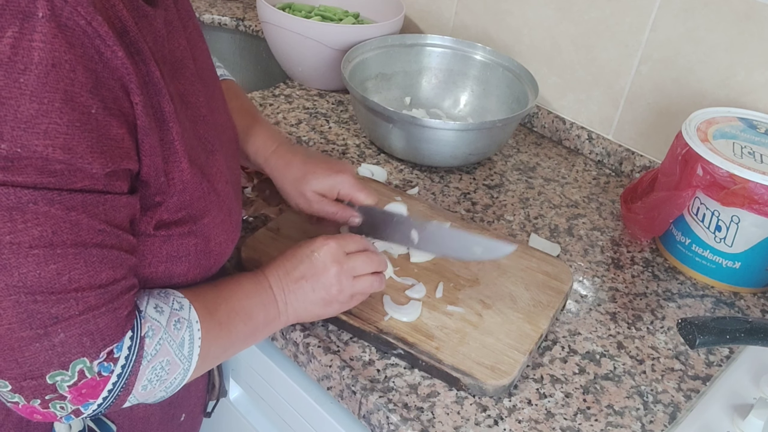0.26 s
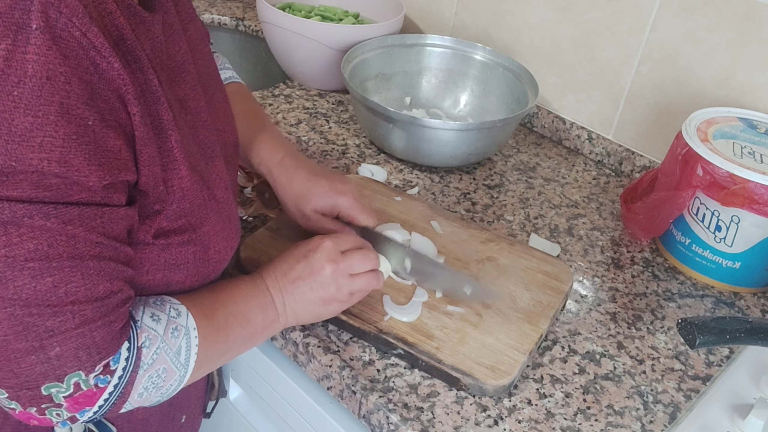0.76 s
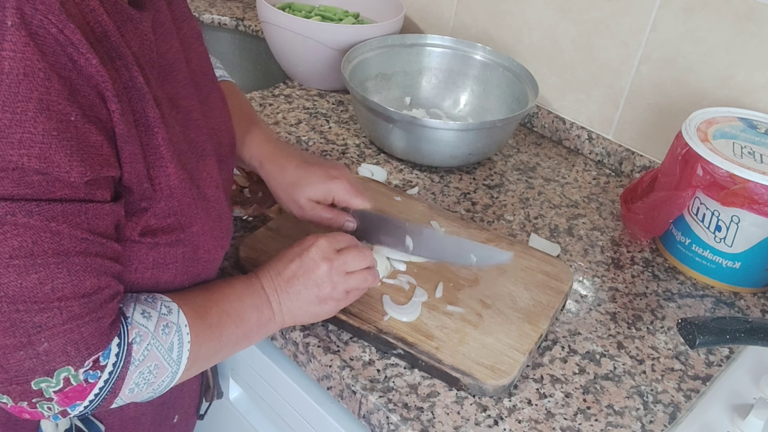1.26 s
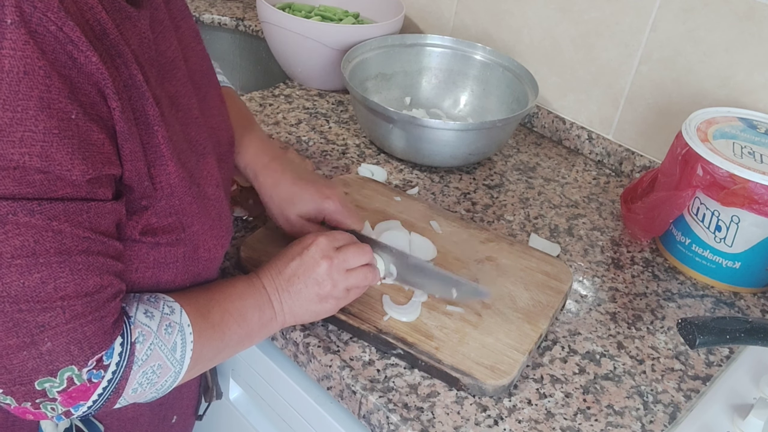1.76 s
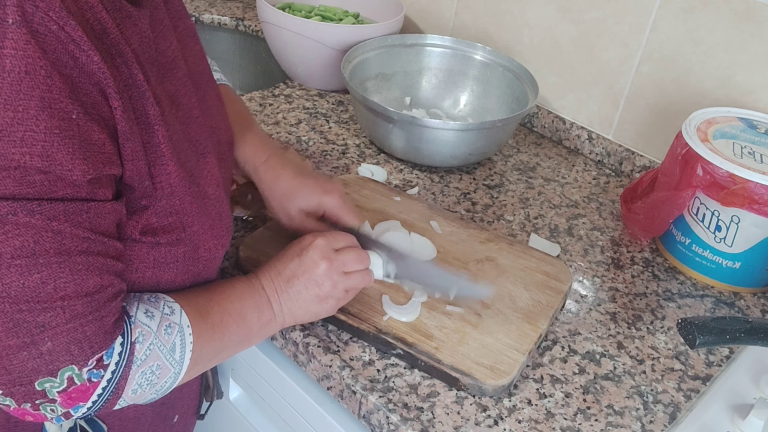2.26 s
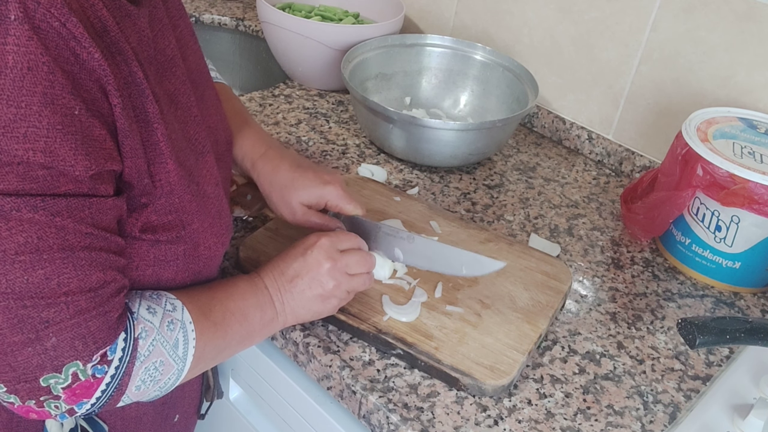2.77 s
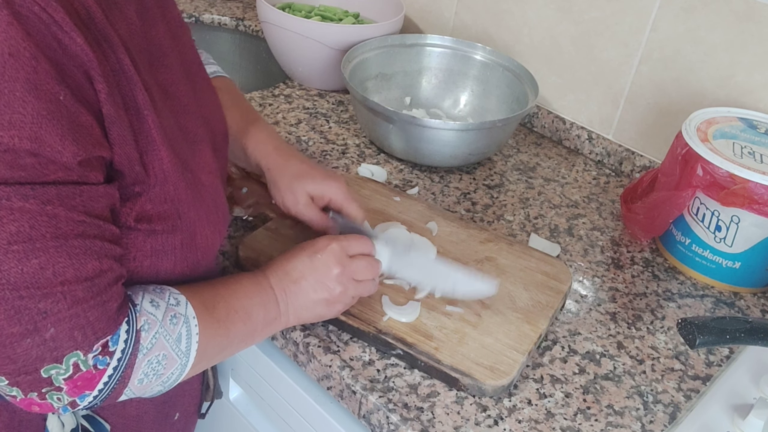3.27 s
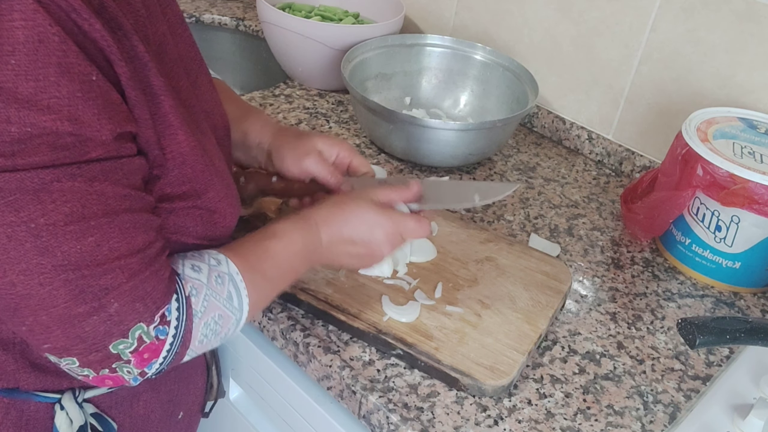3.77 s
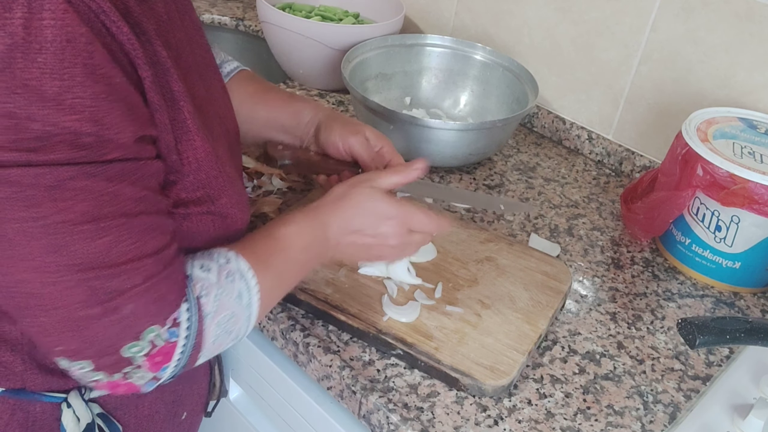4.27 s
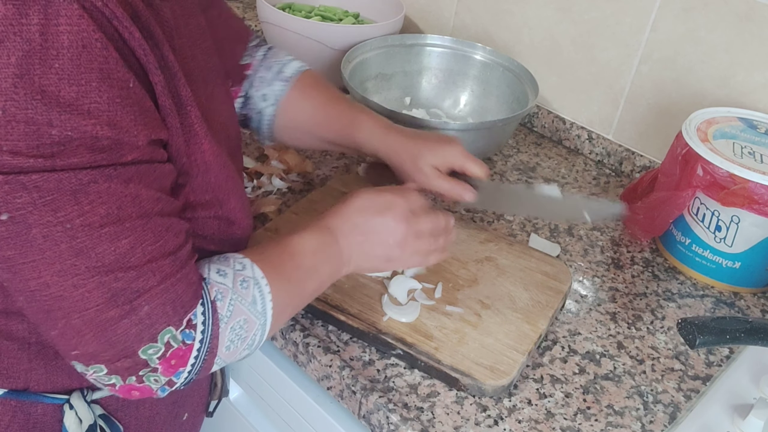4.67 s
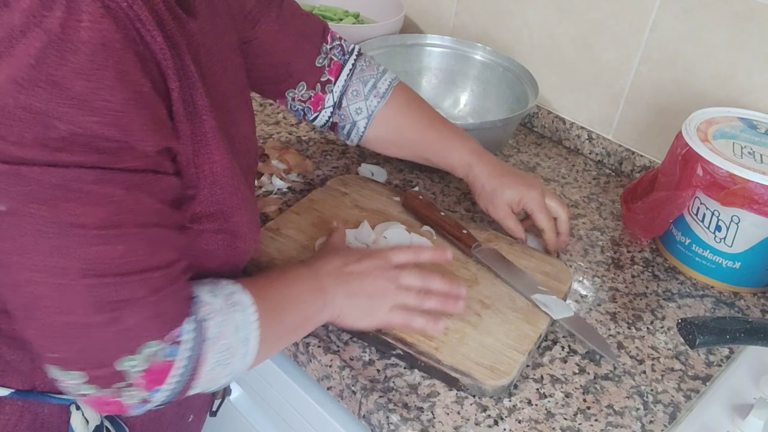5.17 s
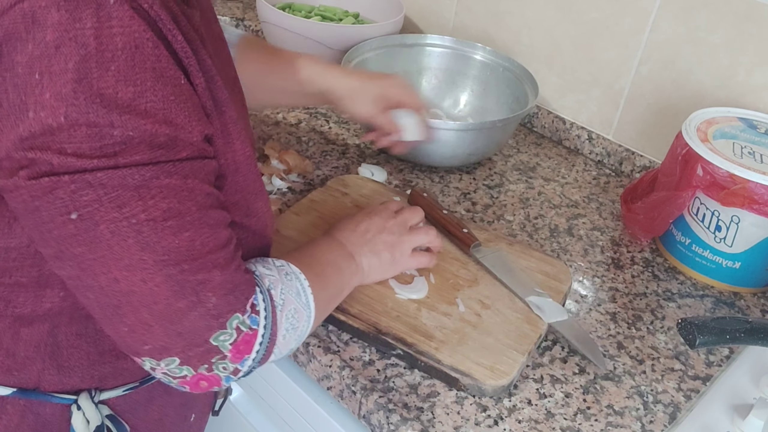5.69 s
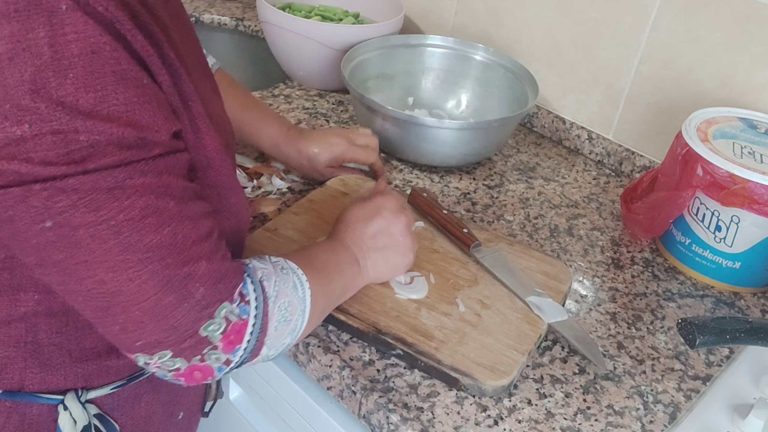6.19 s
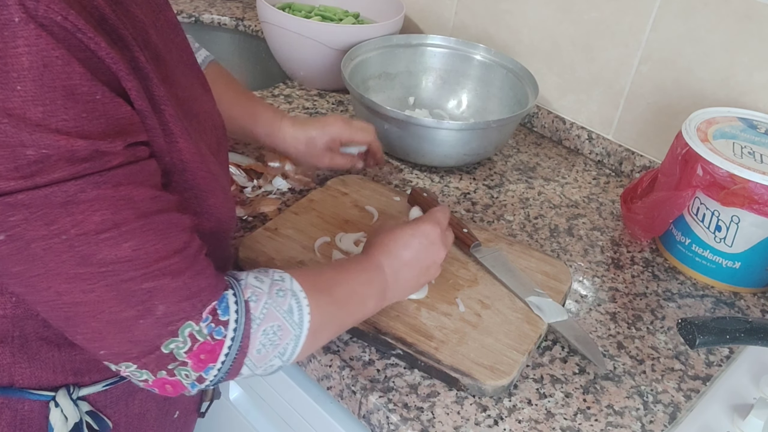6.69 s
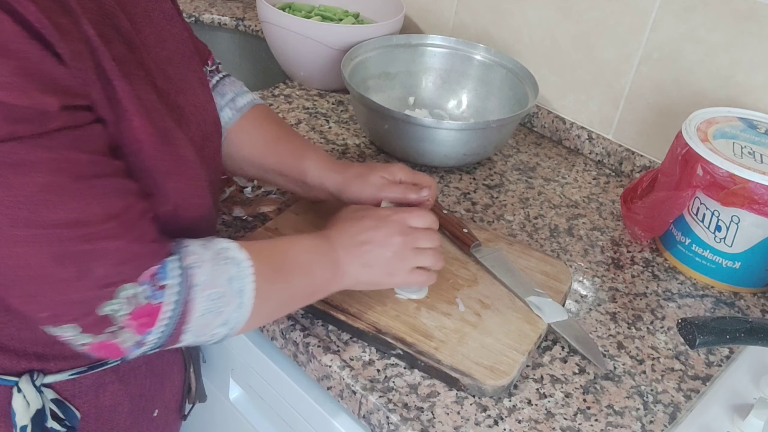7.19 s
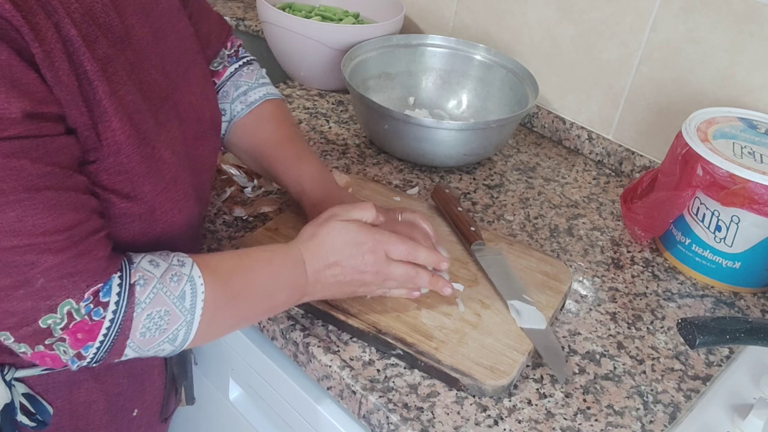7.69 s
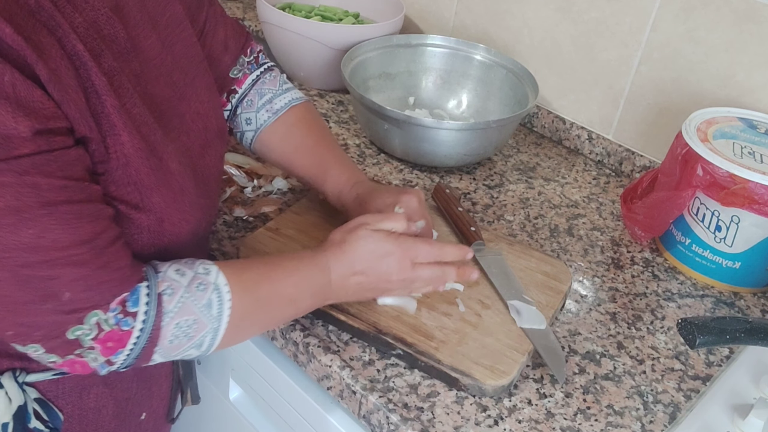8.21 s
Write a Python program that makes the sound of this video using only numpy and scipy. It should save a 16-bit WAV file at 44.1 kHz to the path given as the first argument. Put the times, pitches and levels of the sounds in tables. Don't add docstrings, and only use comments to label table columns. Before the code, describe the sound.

Close in a small tiled kitchen, a knife chops onion in ten even strokes, each a short wet crunch ending in a hard woody knock. After a brief pause comes one higher, sharper chop. Near five seconds the knife clatters down, then hands rub the board, sleeves shuffle and slices snap apart. A refrigerator hums quietly and distant birds whistle.

```python
import sys
import numpy as np
from scipy import signal
from scipy.fft import rfft, irfft, next_fast_len
from scipy.io import wavfile

SR = 44100
rng = np.random.default_rng(int(sys.argv[2]) if len(sys.argv) > 2 else 0)


def persist_wave(psi):
    counts = np.round(np.clip(psi, -1, 1) * 32767).astype(np.int16)
    wavfile.write(sys.argv[1], SR, np.atleast_2d(counts).T)


def invert_db(level):
    return 10 ** (np.asarray(level, dtype=float) / 20)


N = 372629

# time in seconds, knock level in dB, knock pitch in Hz,
# then the low thud and the bright clack, both in dB against the knock.
BLADE_KNOCKS = [(0.497, -11, 756, -14, -16.5), (0.748, -2.5, 820, -17, -15.5),
                (0.964, -2.5, 814, -17.5, -10.5), (1.185, -3, 798, -16.5, -11),
                (1.391, -2, 810, -14.5, -6.5), (1.601, -7.5, 640, -10.5, -22), (1.813, -7, 664, -11, -17.5),
                (2.025, -3.5, 804, -15.5, -15.5), (2.233, -4.5, 840, -15, -12),
                (2.457, -8.5, 766, -11, -11.5), (3.1006, -2.5, 1080, -22, -15)]

# time in seconds, level in dB,
# strongest pitch in Hz, fall in dB per octave away from it.
LIGHT_TAPS = [(1.177, -25, 2000, 7), (2.826, -43, 1400, 13), (3.066, -39, 863, 2),
              (3.1012, -12.5, 1902, 22), (3.1025, -13, 3300, 22), (4.9486, -16.5, 1024, 5),
              (4.9822, -8, 1110, 9.5), (4.9839, -23, 550, 15), (4.9869, -16, 1500, 18),
              (4.993, -11, 1500, 21), (4.996, -10, 2200, 10), (4.9981, -13, 5300, 18),
              (4.9994, -15, 3500, 5.5), (5.0027, -27, 2080, 12), (5.012, -27, 7260, 15),
              (5.022, -28, 1500, 1), (5.0445, -16, 1260, 13), (5.048, -20, 577, 16), (5.097, -17, 690, 26),
              (5.1605, -40, 2270, 8), (5.162, -23.5, 1080, 7.5), (5.173, -29.5, 785, 9),
              (5.391, -40, 1490, 17), (5.397, -38, 590, 21), (5.495, -46, 1500, 12), (5.6272, -22, 1550, 8),
              (5.629, -28.5, 3420, 14), (5.64, -26, 1500, 8), (5.644, -28.5, 590, 10),
              (5.668, -35.5, 590, 9), (5.71, -37, 450, 16), (5.962, -34.5, 990, 11), (6.212, -36, 1814, 5),
              (7.509, -25.5, 1513, 5.5), (7.509, -30.5, 3130, 21), (7.515, -39, 2500, 8),
              (7.522, -29, 570, 21), (7.526, -36.5, 2300, 14), (7.539, -35.5, 1160, 22),
              (7.563, -33.5, 600, 7), (7.587, -47, 600, 3)]


def at_hz(points, hz):
    hz_points, values = np.array(points)[:, 0], np.array(points)[:, 1]
    return np.interp(np.log(hz), np.log(hz_points), values)


def rms_one(x):
    return x / np.sqrt(np.mean(x ** 2) + 1e-20)


def low_pass(x, order, cut_hz):
    return signal.sosfilt(signal.butter(order, cut_hz, fs=SR, output="sos"), x)


def high_pass(x, cut_hz):
    return signal.sosfilt(signal.butter(2, cut_hz, "high", fs=SR, output="sos"), x)


def band_pass(x, edges_hz):
    return signal.sosfilt(signal.butter(2, edges_hz, "band", fs=SR, output="sos"), x)


def coloured(x, points):
    size = next_fast_len(x.shape[-1], True)
    hz = np.maximum(np.arange(size // 2 + 1) * SR / size, 1)
    return irfft(rfft(x, size) * invert_db(at_hz(points, hz)), size)[..., :x.shape[-1]]


def drift(rate):
    knots = rng.standard_normal(int(N / SR * 60) + 2)
    return np.interp(np.arange(N) / SR * rate, np.arange(len(knots)), knots)


def ring(x, hz, width_hz):
    shrink = np.exp(-np.pi * width_hz / SR)
    turn = 2 * np.pi * hz / SR
    return signal.lfilter([0, np.sin(turn)], [1, -2 * shrink * np.cos(turn), shrink * shrink], x + 1e-18)


def pair(size):
    # pitch in Hz, left-right likeness from 0 to 1 (below 0 counts as 0).
    likeness = [(60, -0.55), (180, 0.99), (550, 0.43), (1650, -0.5), (4970, -1), (15000, -0.03)]
    fast = next_fast_len(size, True)
    hz = np.maximum(np.arange(fast // 2 + 1) * SR / fast, 1)
    alike = np.clip(at_hz(likeness, hz), 0, .99)
    mid, side = rfft(rng.standard_normal((2, size)), fast)
    both = np.sqrt(1 + alike) * mid + np.sqrt(1 - alike) * side * [[1], [-1]]
    return irfft(both, fast)[:, :size] / np.sqrt(2)


def grains(per_s, spread_db):
    sizes = invert_db(spread_db * np.minimum(rng.exponential(1, N), 3.5))
    signs = rng.choice([-1, 1], N)
    return rms_one(sizes * signs * (rng.random(N) < per_s / SR))


def whistle(rows, width_hz, gain_db):
    t = np.arange(N) / SR
    s, db, hz = np.transpose(rows)
    rough = low_pass(rng.standard_normal((2, N)), 2, width_hz / 2)
    turn = 2 * np.pi * np.cumsum(np.interp(t, s, hz)) / SR
    level = invert_db(np.interp(t, s, db + gain_db, -140, -140))
    return level * rms_one(rough[0] * np.cos(turn) + rough[1] * np.sin(turn))


def refrigerator():
    # pitch in Hz, level in dB per Hz.
    rumble_colour = [(8.2, -26), (14, 10), (25, -5.5), (48, -15), (170, -25), (202, -22), (256, -29.5),
                     (305, -20.5), (441, -29), (624, -29.5), (2100, -39.5), (2500, -52.5), (3250, -69.5),
                     (5500, -120)]
    # pitch in Hz, level in dB per Hz.
    air_colour = [(1500, -33), (2300, -1), (3500, 1), (5000, -4.5), (7000, -10.5), (8700, -11), (12500, -9),
                  (16000, -6.5)]
    # pitch in Hz, level in dB.
    motor_lines = [(100, -68), (199.5, -68.5), (301, -75.5), (344, -79), (4813, -81)]
    t = np.arange(N) / SR
    hum = 0
    for hz, db in motor_lines:
        level = invert_db(db - 3.0 + 2.1 * drift(13))
        hum = hum + level * np.sin(2 * np.pi * hz * t + 2.3 * drift(6.5))
    rumble = invert_db(-50.5) * rms_one(coloured(pair(N), rumble_colour))
    air = invert_db(-72) * rms_one(coloured(pair(N), air_colour))
    return rumble + air + hum


def gestures(rows, rise_db_per_s, fall_db_per_s):
    lazy_s = 0.29
    t = np.arange(0, N + 64, 64) / SR
    first, second = 0, 0
    for s, length, db, other_db in rows:
        before, after = np.maximum(s - t, 0), np.maximum(t - s - length, 0)
        edges_db = rise_db_per_s * before + fall_db_per_s * after
        shape = invert_db(db - edges_db / (1 + length / lazy_s))
        first = first + shape ** 2
        second = second + (shape * invert_db(other_db)) ** 2
    return [np.interp(np.arange(N) / SR, t, np.sqrt(power)) for power in (first, second)]


def crackle():
    ring_cycles = 2.2
    pops = grains(per_s=350, spread_db=3.0)
    dealt = rng.integers(0, 10, N)
    out = 0
    for k, hz in enumerate(np.geomspace(1300, 7000, 10)):
        out = out + ring(pops * (dealt == k), hz, hz / ring_cycles / np.pi)
    return rms_one(out)


def rubs():
    # start in seconds, length in seconds, hiss level in dB,
    # pressure as scrape over hiss in dB.
    strokes = [(0.004, 0.0045, -58, -7), (2.826, 0.021, -72.5, -2), (3.885, 0.0085, -63, -4),
               (4.525, 0.042, -63.5, -8), (4.61, 0.031, -66.5, -2.5), (4.8, 0.091, -78, 14),
               (5.008, 0.021, -54, -9), (5.26, 0.14, -72.5, -10), (5.43, 0.075, -70, -3.5),
               (5.58, 0.15, -69, -11), (5.785, 0.28, -56.5, -4), (6.035, 0.042, -59, 1.5),
               (6.12, 0.053, -58, 3.5), (6.2, 0.057, -53.5, 2.5), (6.27, 0.056, -64.5, 9),
               (6.44, 0.2, -64, -3), (6.72, .11, -61, -11), (6.888, 0.016, -68, -4), (6.922, .02, -59, 0),
               (6.947, 0.018, -48, -4.5), (6.986, 0.0089, -57, 5), (7.02, 0.12, -59.5, -4.5),
               (7.235, 0.039, -63, -23), (6.3, 2.6, -74.5, -0.5), (7.6, 0.14, -70, 4.5),
               (7.745, 0.13, -63, 8), (7.84, .04, -63, 8.5), (7.9, 0.32, -54.5, -4),
               (8.155, 0.016, -59.5, 8.5), (8.197, 0.024, -50.5, 7), (8.25, 0.024, -53, 1.5),
               (8.31, 0.12, -62.5, 3)]
    # start in seconds, length in seconds, shuffle level in dB,
    # brush over shuffle in dB.
    moves = [(0.004, 0.047, -55, -17), (2.69, 0.045, -64, -14), (2.828, 0.065, -59, -29),
             (3.75, 0.25, -72.5, -1.5), (4.88, 0.043, -73, -18.5), (5.23, 0.021, -48, -9.5),
             (5.39, 0.076, -57, -4.5), (5.63, 0.19, -52.5, -3.5), (5.755, 0.022, -55, -1.5),
             (5.8, 0.11, -61, -8), (6.07, 0.037, -51, -12), (6.2, 0.15, -56.5, -6),
             (6.6, 0.034, -67.5, 4.5), (6.99, 0.023, -77, -11), (7.1, 0.042, -69.5, 7.5),
             (7.45, 0.17, -52.5, -3.5), (7.8, 0.11, -56, 8.5), (7.92, 0.15, -60, 0), (8.29, 0.071, -69, 6)]
    # levels of hiss, scrape, shuffle and brush in dB.
    resting_db = [-88.5, -80, -77, -77]
    # pitch in Hz, level in dB per Hz.
    hiss_colour = [(1760, -24.5), (3000, -6), (3680, -4), (4140, -5), (5290, -6.5), (7250, -5.5),
                   (8640, -14.5), (12100, -9), (15100, -8.5), (16000, -25.5)]
    scrape_colour = [(180, -39), (300, -29.5), (601, -13), (734, -12), (1290, -4), (1490, 0), (1900, -2.5),
                     (2650, -0.5), (5000, -16), (6500, -42), (11000, -120)]
    shuffle_colour = [(35, -36), (60, -3), (102, 1), (135, -28), (177, -0.5), (231, -1), (296, -11.5),
                      (500, -10), (650, -32.5), (1100, -120)]
    brush_colour = [(250, -27.5), (420, -4.5), (700, -0.5), (1000, -2.5), (1500, -27.5)]

    moving = gestures(strokes, rise_db_per_s=1104, fall_db_per_s=380)
    moving = moving + gestures(moves, rise_db_per_s=288, fall_db_per_s=180)
    hiss, scrape, shuffle, brush = [np.hypot(level, invert_db(db)) for level, db in zip(moving, resting_db)]

    together = 2.5 * drift(45)
    bright = rms_one(coloured(pair(N) + 0.35 * grains(2500, 3.0), hiss_colour))
    bright = bright * invert_db(3.5 + together + 1.2 * drift(55))
    dull = rms_one(coloured(pair(N) + 0.38 * grains(1500, 2.2), scrape_colour))
    dull = dull * invert_db(2.0 + together + 1.0 * drift(48))
    low = rms_one(coloured(rng.standard_normal(N), shuffle_colour)) * invert_db(-1.5)
    soft = rms_one(coloured(pair(N), brush_colour)) * invert_db(-3.0 + together)
    return hiss * (bright + invert_db(-7) * crackle()) + scrape * dull + shuffle * low + brush * soft


def birds():
    # time in seconds, level in dB, pitch in Hz.
    calls = [
        [(.03, -62, 3900), (.1, -71, 3800), (.22, -74, 3400), (.36, -82, 3400)],
        [(1.55, -58, 2990), (1.6, -46, 3070), (1.68, -59, 3297), (1.77, -72, 3600)],
        [(3.8, -71, 3203), (3.86, -72.5, 3240), (3.97, -75, 3254), (4.04, -82.5, 3220), (4.22, -78, 3240),
         (4.3, -92.5, 3274), (4.5, -88, 3284), (4.56, -67.5, 3270), (4.63, -84, 3320)],
    ]
    return sum(whistle(rows, width_hz=300, gain_db=-2.0) for rows in calls)


def cuts():
    # start in seconds, crunch level in dB, length in seconds.
    slices = [(0.4746, -36, 0.021), (0.728, -30.5, 0.016), (0.945, -32.5, 0.03), (1.1604, -29.5, 0.023),
              (1.37, -36.5, 0.04), (1.576, -31, 0.033), (1.786, -31.5, 0.026), (1.998, -30.5, 0.027),
              (2.196, -36, 0.045), (2.454, -31.5, 0.0054), (2.826, -35, 0.016), (3.057, -33, 0.052)]
    # pitch in Hz, level in dB per Hz.
    crunch_colour = [(410, -14), (700, -0.5), (1580, -9), (2220, -8), (2530, -11), (3200, -10), (4990, -7),
                     (6570, -4.5), (8650, -15), (13000, -10), (16000, -8)]
    gain_db, fall_s = -11.5, 0.0044
    t, effort = np.arange(N) / SR, np.zeros(N)
    for s, db, length in slices:
        dying = np.exp(-np.maximum(t - s - length, 0) / fall_s)
        effort += invert_db(db + gain_db) * (t > s) * dying
    crunch = rms_one(coloured(grains(per_s=6500, spread_db=8.0), crunch_colour))
    return effort * invert_db(2.8 * drift(64)) * crunch


def knocks():
    mode_widths = [90, 319, 496, 459.3, 1334]
    thud_hz, clack_hz, upper_clack_hz, tick_hz = 202, 1860, 2130, 3400
    tick_db = -22
    gain_db = np.array([4.3, 3.89, 5.2, 0.44, 6.9])
    shift = np.array([0.077, .3, 0.34, 0.21, 0.34])
    crack_db, crack_fall_s, flight_s = -37.5, 0.00077, 0.00043
    dead_hz, dead_width_hz, dead_share = 2661, 350, .7

    size = 4096
    t = np.maximum(np.arange(size) / SR - flight_s, 0)
    out, cracks = np.zeros((2, N + size)), np.zeros(N + size)
    fading = np.exp(-np.pi * np.array(mode_widths)[:, None] * t)
    for s, knock_db, knock_hz, thud_db, clack_db in BLADE_KNOCKS:
        start = round(s * SR)
        against_db = np.array([thud_db, 0, clack_db, clack_db, tick_db + clack_db])
        levels = invert_db(knock_db + against_db + gain_db)
        pitches = np.array([thud_hz, knock_hz, clack_hz, upper_clack_hz, tick_hz])
        modes = np.sin(2 * np.pi * pitches[:, None] * t) * fading
        spot = rng.standard_normal(5)
        out[:, start:start + size] -= np.array([levels, shift * spot * levels]) @ modes
        spray = rng.standard_normal(size) * (t > 0) * np.exp(-t / crack_fall_s)
        cracks[start:start + size] += invert_db(knock_db + crack_db) * spray

    soft = low_pass(out[:, :N] + 1e-18, 2, 3200)
    blows = high_pass(soft, 160)
    gap = signal.iirpeak(dead_hz, dead_hz / dead_width_hz, fs=SR)
    blows = blows - dead_share * signal.lfilter(*gap, blows)
    blows[0] += high_pass(cracks[:N] + 1e-18, 4500)
    blows[1] = high_pass(blows[1], 640)
    return blows


def counter():
    # pitch in Hz, width in Hz, level in dB.
    cabinet = [(46.6, 5, -29.5), (71, 10, -30.5), (95.5, 7.2, -28.5)]
    tap_push_db = -18.5
    pushes = np.zeros(N)
    for s, knock_db, knock_hz, thud_db, clack_db in BLADE_KNOCKS:
        pushes[round(s * SR)] = invert_db(knock_db + thud_db)
    for s, db, hz, fall_db in LIGHT_TAPS:
        pushes[round(s * SR)] += invert_db(db + tap_push_db)
    out = 0
    for hz, width, db in cabinet:
        twin = ring(ring(pushes, hz, width), hz, width)
        out = out + invert_db(db) * twin * width * np.pi / SR * 10
    return out


def taps():
    band_edges = [140, 380, 800, 1700, 4200, 15000]
    body_db = [-15, -2.5, -7.5, -5.5, -9.5]
    ring_db, ring_cycles = -7, 1.9
    size = 1024
    out, click = np.zeros(N), -np.eye(1, size)[0]
    for k, band in enumerate(zip(band_edges, band_edges[1:])):
        shaped = band_pass(click, band)
        shaped = shaped / np.abs(shaped).max()
        middle_hz = np.sqrt(band[0] * band[1])
        sign = (-1) ** k
        for s, db, hz, fall_db in LIGHT_TAPS:
            level_db = db + body_db[k] - fall_db * abs(np.log2(middle_hz / hz))
            out[round(s * SR):][:size] += invert_db(level_db) * sign * shaped
    t = np.arange(size) / SR
    for s, db, hz, fall_db in LIGHT_TAPS:
        tone = np.sin(2 * np.pi * hz * t) * np.exp(-t * hz / ring_cycles)
        out[round(s * SR):][:size] -= invert_db(db + ring_db) * tone
    return out


def snaps():
    # time in seconds, level in dB, pitch in Hz.
    partings = [(3.886, -50, 6015), (4.755, -52, 11000), (5.7806, -59, 3020), (5.843, -38, 4100),
                (6.123, -46, 2380), (6.1901, -33, 2780), (6.2112, -43, 1900), (7.7484, -38, 2650),
                (6.2166, -42, 2300), (6.3633, -50, 2690), (6.4222, -44, 2340), (6.568, -49, 2190),
                (6.7844, -37.5, 6120), (6.8905, -39, 6550), (6.9232, -33.5, 5270), (6.948, -37, 3570),
                (6.9862, -24, 5300), (6.991, -37, 5900), (6.993, -49, 5000), (7.2106, -56, 3460),
                (7.913, -30.5, 5200), (8.1877, -33, 3020), (8.264, -49, 2750)]
    gain_db, ring_cycles, spit_db, spit_fall_s = 3.5, 1.4, -20, 0.00027
    size = 600
    out, t = np.zeros(N), np.arange(size) / SR
    for s, db, hz in partings:
        spit = invert_db(spit_db) * rng.standard_normal(size) * np.exp(-t / spit_fall_s)
        tone = np.sin(2 * np.pi * hz * t) * np.exp(-t * hz / ring_cycles)
        out[round(s * SR):][:size] += invert_db(db + gain_db) * (tone + spit)
    return out


def bowl_skid():
    # time in seconds, level in dB, pitch in Hz.
    squeak = [
        (5.83, -50, 4330),
        (5.86, -44.5, 4210),
        (5.914, -38.5, 4460),
        (6.006, -54, 4550),
        (6.06, -60, 4410),
    ]
    return whistle(squeak, width_hz=550, gain_db=-7.0)


def palm_slide():
    # time in seconds, level in dB, pitch in Hz.
    hollow = [
        (7.72, -54, 1430),
        (7.826, -66, 1390),
        (7.864, -48, 1458),
        (8.016, -54, 1484),
        (8.068, -49, 1517),
        (8.146, -59, 1526),
        (8.206, -40.5, 1454),
        (8.28, -65, 1540),
    ]
    return whistle(hollow, width_hz=220, gain_db=-5.5)


def wall(x):
    later = np.concatenate([np.zeros(round(0.002278 * SR)), x])[:N]
    return invert_db(-1.5) * low_pass(later + 1e-18, 1, 3000)


def ports(x):
    lag_s = 7e-5
    size = next_fast_len(N, True)
    hz = np.arange(size // 2 + 1) * SR / size
    left = irfft(rfft(x, size) * np.exp(-2j * np.pi * hz * lag_s), size)[:N]
    return np.array([left, x])


def kitchen(x, modes, decay, tilt, diffuse_db, modes_db, first_s):
    # pitch in Hz, level in dB.
    echo_colour = [(100, -28.5), (160, -6), (300, -4.5), (400, -3), (480, -7), (570, -7), (700, -6),
                   (880, -4.5), (1110, -3.5), (1400, 3.5), (2000, -4.5), (2500, -1.5), (3000, 0),
                   (4000, -3), (6000, 2.5), (14000, 6.5)]
    hall_db, hall_t60_s = -22.5, 0.75
    build_s = 0.0039
    t = np.arange(32768) / SR
    edges = 60 * 2 ** np.arange(0, 8.3, .5)
    white = [pair(len(t)), pair(len(t))]
    echoes = 0
    for k, (low, high) in enumerate(zip(edges, edges[1:])):
        hz = np.sqrt(low * high)
        level = invert_db(at_hz(echo_colour, hz) + at_hz(tilt, hz))
        dying = invert_db(-60 * t / at_hz(decay, hz)) + invert_db(hall_db - 60 * t / hall_t60_s)
        echoes = echoes + band_pass(white[k % 2], [low, high]) * level * dying
    onset = np.clip(t / first_s - 1, 0, 1) * (1 - 0.067 * np.exp(-t / build_s))
    echoes = invert_db(diffuse_db) * echoes * onset
    for k, (hz, db, t60) in enumerate(modes):
        standing = np.sin(2 * np.pi * hz * t) * (-1) ** k
        echoes = echoes + invert_db(modes_db + db - 60 * t / t60) * standing
    return signal.fftconvolve(x[None], echoes, axes=1)[:, :N]


def room_from_middle(x):
    # pitch in Hz, level in dB, time to fall 60 dB in seconds.
    standing_waves = [(170, 4, 0.29), (185.8, 9.5, 0.24), (234.9, 7.5, 0.29), (342.3, 5.5, 0.32),
                      (373, 2.5, .25), (425, 4, 0.27), (476, -2, .22), (550, 3.5, 0.2), (637, -4, 0.4),
                      (708, -3, 0.21), (772, -8.5, 0.3), (855.4, -6, 0.22), (997, 2, 0.16), (1087, -5, 0.15),
                      (1115, -9, .28), (1166, 0.5, 0.11), (1222, -6.5, 0.19), (1281, -6.5, .3),
                   (1341, -11, .3), (1497, -9, .28), (1698, -8.5, .22), (1771, -9.5, .3), (1930, -12, .25),
                   (2083, -9.5, .15), (2100, -9.5, 0.24), (2196, -9, .25), (2440, -12, .25),
                   (3219, -12.5, .3)]
    # pitch in Hz, time for echoes to fall 60 dB in seconds.
    decay = [(60, 0.64), (250, 0.37), (740, 0.31), (1940, 0.16), (2700, .2), (3600, 0.21), (5100, 0.18),
             (13500, 0.05)]
    no_tilt = [(1000, 0)]
    return kitchen(x, standing_waves, decay, no_tilt, diffuse_db=-24.0, modes_db=-53.0, first_s=0.0016)


def room_from_edge(x):
    # pitch in Hz, level in dB, time to fall 60 dB in seconds.
    edge_modes = [(180.6, 10.5, .3), (233.2, 8, .29), (346.6, -4.5, .3), (420.6, 3, .25), (523, 2.5, .3),
                  (562.7, 2, .25), (677, 1.5, 0.22), (948, -1, 0.16), (1030, -0.5, .3), (1116, 0, 0.2),
                  (1221, 2, .3), (1422, -1, 0.24), (1760, -1.5, .21), (2045, -3, .25)]
    # pitch in Hz, time for echoes to fall 60 dB in seconds.
    decay = [(60, 0.64), (250, 0.42), (740, 0.28), (1400, .26), (2400, 0.27), (3600, 0.25), (5100, 0.2),
             (13500, 0.054)]
    # pitch in Hz, level in dB.
    tilt = [(150, 0), (400, 1), (900, -1), (1500, -2), (2400, 3), (3500, 0.5), (6000, 0)]
    return kitchen(x, edge_modes, decay, tilt, diffuse_db=-18.0, modes_db=-43.5, first_s=0.0006)


def scene():
    blows, elsewhere = knocks()
    board = blows + cuts() + snaps() + bowl_skid()
    light = taps()
    direct = ports(board + light + wall(board + light))
    room = room_from_middle(board)
    aside = room_from_edge(elsewhere + invert_db(-5) * light)
    hands = rubs() + palm_slide()
    return direct + room + aside + counter() + hands + birds() + refrigerator()


def top_cut(x):
    return signal.sosfilt(signal.butter(12, 16990, fs=SR, output="sos"), x)


def record(dry):
    # pitch in Hz, left minus right in dB.
    lean = [(60, -0.5), (180, 1), (550, -0.5), (1650, 0), (4970, -3), (15000, -6.5)]
    null_hz, null_width_hz = 8750, 320
    left = coloured(dry[0], np.array(lean) * [1, .5])
    right = coloured(dry[1], np.array(lean) * [1, -.5])
    null = signal.iirnotch(null_hz, null_hz / null_width_hz, fs=SR)
    heard = signal.lfilter(*null, np.array([left, right]))
    rounded = 1.3 * np.tanh(heard / 1.3)
    mix = signal.sosfilt(signal.ellip(8, .5, 40, 15850, fs=SR, output="sos"), rounded)
    return top_cut(mix)


dry = scene()
out = record(dry)
persist_wave(out)
```